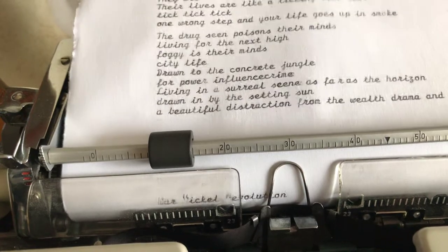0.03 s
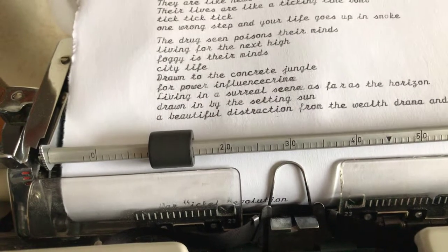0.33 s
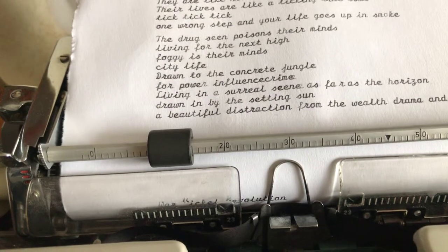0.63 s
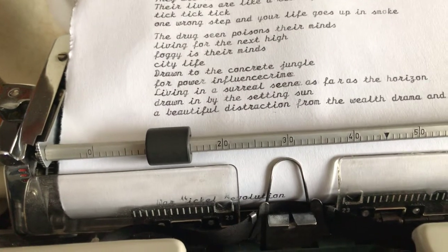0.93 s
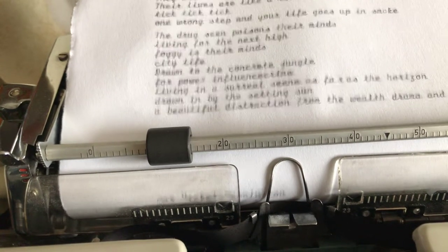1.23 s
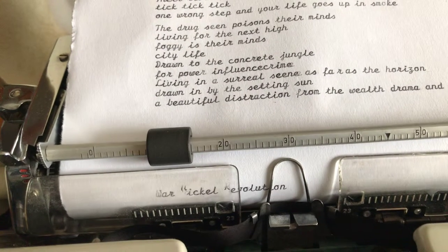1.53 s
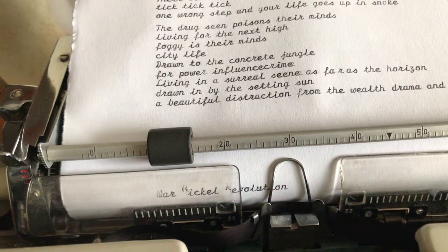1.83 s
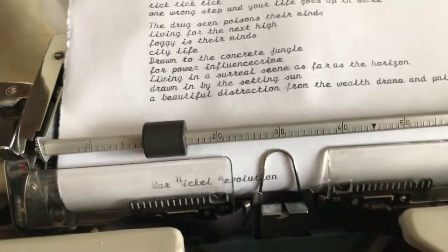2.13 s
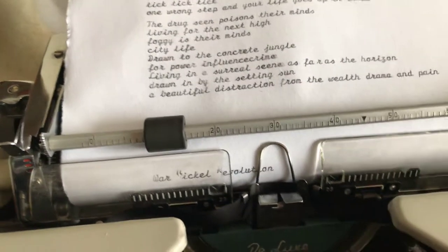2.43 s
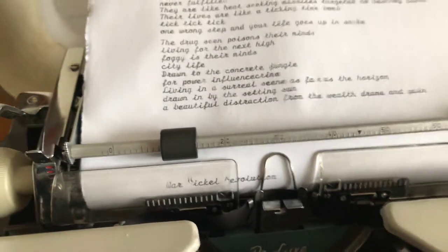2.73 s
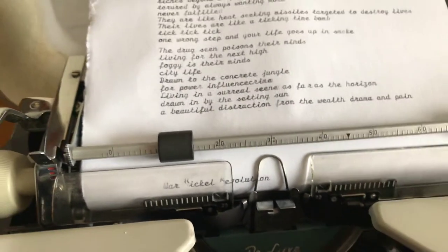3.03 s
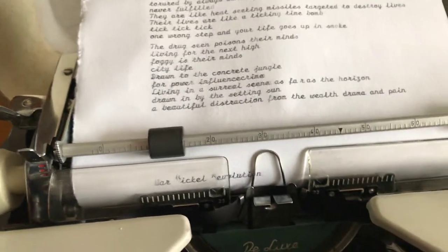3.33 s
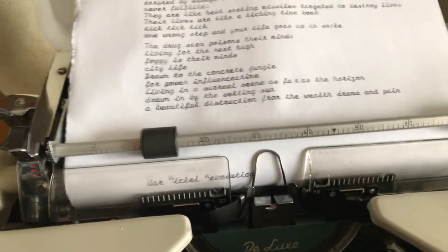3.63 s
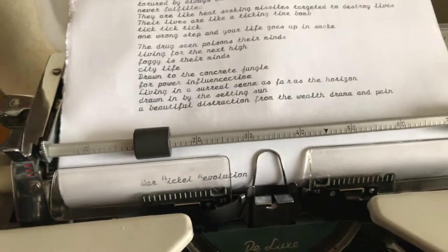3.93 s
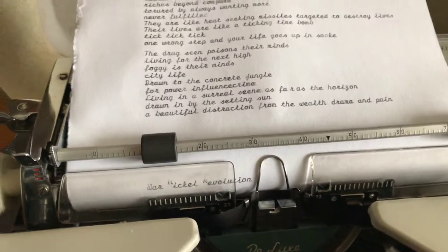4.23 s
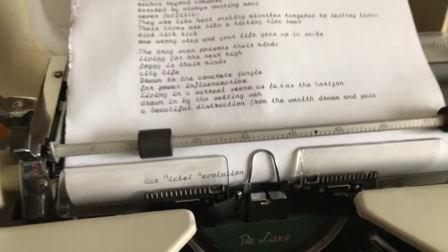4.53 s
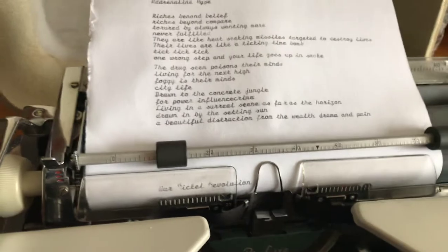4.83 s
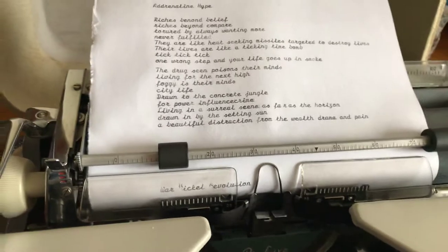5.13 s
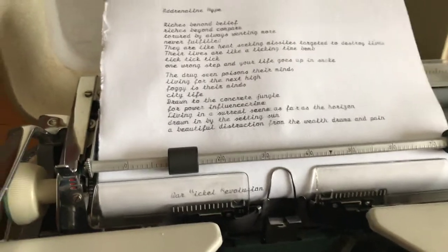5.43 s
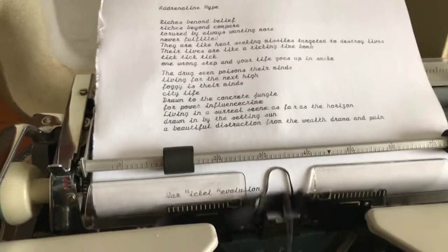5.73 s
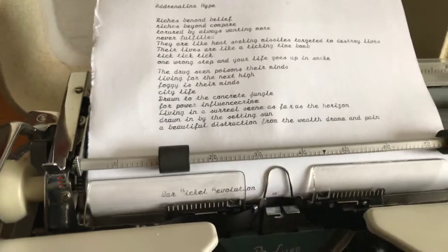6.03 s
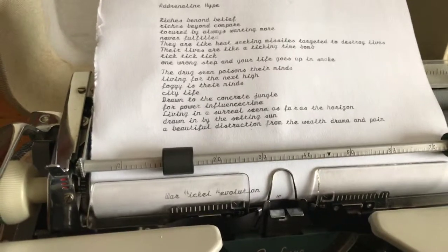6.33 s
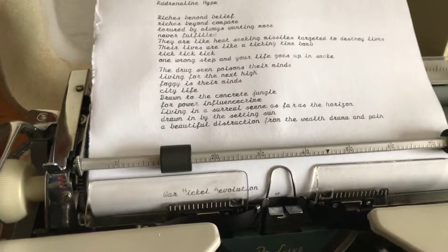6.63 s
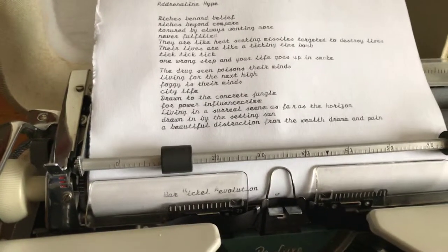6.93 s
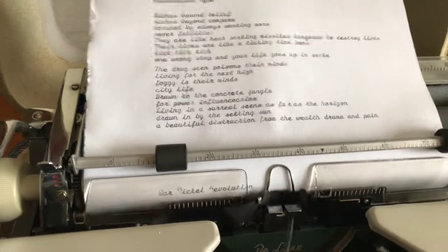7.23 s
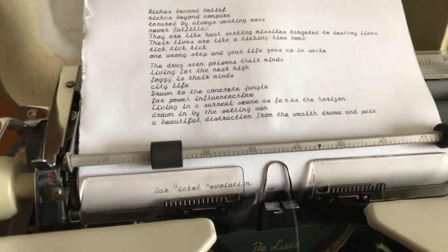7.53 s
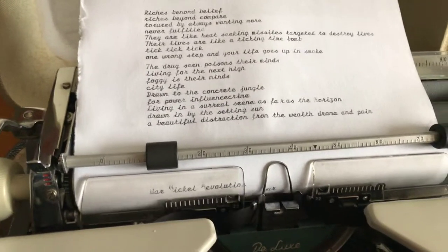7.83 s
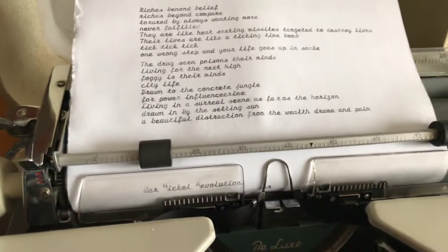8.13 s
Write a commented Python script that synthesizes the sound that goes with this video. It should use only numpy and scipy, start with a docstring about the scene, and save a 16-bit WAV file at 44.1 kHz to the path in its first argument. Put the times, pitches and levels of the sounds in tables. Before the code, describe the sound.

A manual typewriter is worked slowly on a desk in a quiet room, close to the microphone. The platen is turned with a few dry ratchet clicks. After a pause the space bar is tapped four times and the carriage steps back. Three separate letters then crack against the platen, each with a brief steel ring and a clink as the type bar falls back. One more space follows.

```python
"""A few dry ratchet clicks as a platen is turned: a portable manual typewriter on a desk in a quiet room,
one small microphone close by. The space bar is tapped four times, the carriage is stepped back,
three letters are struck and one more space follows. Levers scrape, type slugs crack on the platen
and the blows ring the steel frame; each jolt thuds into the desk and rattles the casing."""
import sys
import numpy as np
from scipy import signal
from scipy.fft import rfft, irfft
from scipy.io import wavfile

SR = 44100
rng = np.random.default_rng(int(sys.argv[2]) if len(sys.argv) > 2 else 0)


def bounce(signal):
    """Save signal as a 16-bit WAV file at the path given by the first command-line argument."""
    frames = np.transpose(np.atleast_2d(signal))
    limited = np.clip(frames, -1, 1)
    pcm = np.round(limited * 32767).astype(np.int16)
    wavfile.write(sys.argv[1], SR, pcm)


N = 360738

# Platen ratchet clicks. Each row: start in seconds, level in dB, decay in seconds, treble in dB.
RATCHET_CLICKS = [(.2884, -20, 0.0031, 8), (.694, -42, 0.005, -24), (1.2600, -19.5, 0.0041, -14),
                  (1.2808, -25, 0.0047, -9), (1.341, -44, 0.0035, -12)]
# Typed letters. Each row: key press, strike and landing times in seconds; strike, landing and key
# levels in dB; key scrape length in seconds; key treble in dB.
KEYSTROKES = [(5.694, 5.7657, 5.962, -13, -28, -46, .026, -8),
              (7.102, 7.1437, 7.281, -13, -28.5, -36, .0038, 13),
              (7.526, 7.5675, 7.694, -12.5, -29, -39.5, .011, 6)]
# The carriage halts. Each row: delay in seconds, thud in dB re step, rattle in dB re thud.
HALT_JOLT = [(.026, -10, -16)]
# Tone of the dull casing and of loose steel parts. Each row: frequency in Hz, gain in dB.
CASING_TONE = [(80, -6.5), (190, 6), (350, -3), (550, 1.5), (700, -3), (920, -1.5), (1100, -5), (1350, -3),
               (2400, -8), (4000, -17), (9000, -41), (16000, -40.5)]
CLATTER_TONE = [(100, -17), (380, -20), (600, -2.5), (900, -6.5), (1200, -1.5), (1600, -1), (2500, 12),
                (4000, 0), (6500, -2.5), (9000, -12.5), (16000, -16)]


def from_db(db):
    return 10 ** (np.asarray(db) / 20)


def at_hz(points, hz):
    """Read a table on a log-frequency axis."""
    known_hz, values = np.transpose(points)
    return np.interp(np.log(hz + 1), np.log(known_hz), values)


def add(track, s, sound):
    """Mix a sound into a track from s seconds on."""
    start = max(round(s * SR), 0)
    track[start:start + len(sound)] += sound[:N - start]


def colour(x, spectrum, size=8192):
    """Minimum-phase filter that keeps the power of white noise."""
    gain = from_db(at_hz(spectrum, np.arange(size // 2 + 1) * SR / size))
    cepstrum = irfft(np.log(gain))
    cepstrum[1:size // 2] *= 2
    cepstrum[size // 2 + 1:] = 0
    response = irfft(np.exp(rfft(cepstrum)))
    return signal.oaconvolve(x, response / np.linalg.norm(response))[:N]


def ring(clicks, hz, t60):
    """A unit click starts a sine of height 1 that falls 60 dB in t60 seconds."""
    radius = np.exp(-np.log(1000) / (t60 * SR))
    angle = 2 * np.pi * hz / SR
    return signal.lfilter([0, np.sin(angle)], [1, -2 * radius * np.cos(angle), radius ** 2], clicks + 1e-18)


def ring_modes(x, modes, gain_db):
    """A body rings in all its modes, neighbours in opposite senses."""
    return sum(ring(x, hz, t60) * from_db(mode_db + gain_db) * (-1) ** k
               for k, (hz, mode_db, t60) in enumerate(modes))


def resonate(x, modes):
    """The short-lived modes of a small part lift their own pitches out of each contact."""
    out = x
    for hz, lift_db, t60 in modes:
        b, a = signal.iirpeak(hz, np.pi * hz * t60 / np.log(1000), fs=SR)
        out = out + (from_db(lift_db) - 1) * signal.lfilter(b, a, x)
    return out


def soft_push(length_s):
    """A smooth pulse of force with unit area."""
    push = np.sin(np.pi * np.minimum(np.arange(SR // 20) / (length_s * SR), 1)) ** 2
    return push / push.sum()


def chatter(decay_s, rise_s, grain_db=3, size=16384):
    """One metal contact: a swarm of tiny uneven impacts that swells and dies."""
    t = np.arange(size) / SR
    envelope = (1 - np.exp(-t / rise_s)) * np.exp(-np.minimum(t / decay_s, 20))
    impacts, sizes = rng.standard_normal((2, size))
    swarm = envelope * impacts * from_db(grain_db * sizes)
    return swarm * np.sqrt(decay_s * SR / 2) / np.linalg.norm(swarm)


def scrape(length_s, grain_db=4, size=4096):
    """A lever slides over its guide: the grit swells with its speed and stops with it."""
    progress = np.arange(size) / (length_s * SR)
    speed = progress * np.exp(-np.minimum(progress ** 2, 20))
    impacts, sizes = rng.standard_normal((2, size))
    grit = speed * impacts * from_db(grain_db * sizes)
    return grit * np.sqrt(length_s * SR / 2) / np.linalg.norm(grit)


def contacts(rows, spectrum, touch, treble_hz=7000, **shape):
    """All chatters or scrapes of one part; each has its own level, length and brightness."""
    track = np.zeros(N)
    b, a = signal.butter(1, treble_hz, "high", fs=SR)
    for s, level_db, length_s, treble_db in rows:
        swarm = touch(length_s, **shape)
        treble = (from_db(treble_db) - 1) * signal.lfilter(b, a, swarm)
        add(track, s, from_db(level_db) * (swarm + treble))
    return colour(track, spectrum)


def after(s, level_db, stages):
    """Contacts at set delays from an action, scaled by its strength."""
    return [(s + delay_s, level_db + relative_db, *rest) for delay_s, relative_db, *rest in stages]


def along(start_s, end_s, level_db, stages):
    """Contacts at set places along a movement: a slower movement spreads them out."""
    return [(start_s + share * (end_s - start_s), level_db + relative_db, *rest)
            for share, relative_db, *rest in stages]


def room_tone(level_db=-58.6):
    """The still air of the room: a faint, low hush."""
    # Each row: frequency in Hz, gain in dB.
    air_tone = [(25, -9), (60, -5.5), (100, -6), (130, 1), (175, -7), (240, -4), (400, -12), (700, -18.5),
                (1200, -18.5), (2200, -21.5), (3200, -25.5), (5000, -32), (7000, -33), (10500, -41),
                (14000, -40.5)]
    return from_db(level_db) * colour(rng.standard_normal(N), air_tone)


def room_reflections(x, wet_db=-12.6, build_s=.0027):
    """Diffuse reflections build up, then die at their own rate in each band."""
    # Reverberation. Each row: frequency in Hz, t60 in seconds.
    decay_times = [(100, 0.39), (500, 0.85), (2500, 0.54), (6000, .48), (14000, 0.62)]
    # Its tone. Each row: frequency in Hz, gain in dB.
    reverb_tone = [(100, 5), (800, -2.5), (2400, 2.2), (4000, -2.5), (7000, -7), (14000, -6.5)]
    t, response = np.arange(SR) / SR, 0
    edges_hz = np.geomspace(40, 17000, 13)
    for low, high in zip(edges_hz, edges_hz[1:]):
        band_pass = signal.butter(2, [low, high], "band", fs=SR, output="sos")
        band = signal.sosfilt(band_pass, rng.standard_normal(SR))
        t60 = at_hz(decay_times, np.sqrt(low * high))
        response += band * np.exp(-np.log(1000) * t / t60)
    response *= 1 - np.exp(-t / build_s)
    wet = signal.oaconvolve(x, response / np.linalg.norm(response))[:N]
    return from_db(wet_db) * colour(wet, reverb_tone)


def lingering_ring(level_db=-45):
    """At the start the type basket is still ringing faintly from an earlier blow."""
    track = np.zeros(N)
    add(track, 0, from_db(level_db) * chatter(decay_s=.065, rise_s=.00084))
    return colour(track, CLATTER_TONE)


def desk_thuds(jolts, push_s=.0029, spread_db=1.5, rock_s=.043, rock_db=-9):
    """Soft pushes ring the desk, and the machine rocks back a moment later."""
    # Each row: frequency in Hz, level in dB, t60 in seconds.
    desk_modes = [(58.4, -5.5, .16), (84, -1.5, 0.082), (111.7, 1, 0.18), (134, -6, 0.08), (157, 1, 0.066),
                  (189, 2.5, 0.084), (228.5, -9, 0.16), (290, -4, 0.037)]
    out = np.zeros(N)
    strengths = from_db(spread_db * rng.standard_normal((len(jolts), len(desk_modes))))
    for (hz, mode_db, t60), strength in zip(desk_modes, strengths.T):
        pushes = np.zeros(N)
        for (s, thud_db, _), share in zip(jolts, strength):
            force = from_db(thud_db + mode_db) * share * soft_push(push_s)
            add(pushes, s, force)
            add(pushes, s + rock_s * rng.uniform(.9, 1.1), from_db(rock_db) * force)
        out = ring(pushes, hz, t60) - out   # neighbouring modes swing in opposite senses
    return out


def casing_rattle(jolts, direct_db=-1):
    """Each jolt rattles the thin, loose panels, which add a hollow ring."""
    # Each row: frequency in Hz, level in dB, t60 in seconds.
    panel_modes = [(544, -13, .4), (640, -2, .04), (738, -16, .2), (915, -11, .3), (945, -5, .04),
                   (1130, -13, .35), (1357, -11, .25), (1825, -10, .07), (2600, -4, .012)]
    rattle = np.zeros(N)
    for s, thud_db, rattle_db in jolts:
        add(rattle, s, from_db(thud_db + rattle_db) * chatter(decay_s=.034, rise_s=.005))
    hollow = ring_modes(rattle, panel_modes, gain_db=-30.5)
    return from_db(direct_db) * colour(rattle, CASING_TONE) + hollow


def carriage_lurches(push_s=.012):
    """The stopping carriage shoves the whole machine on its rubber feet."""
    # Each row: start in seconds, level in dB.
    lurches = [(4.752, -26), (5.772, -29), (5.95, -38), (7.70, -41)]
    pushes = np.zeros(N)
    for s, level_db in lurches:
        add(pushes, s, from_db(level_db) * soft_push(push_s))
    return ring(pushes, hz=52, t60=.13)


def frame_ring(blows):
    """Every blow rings the same modes of the steel frame and type basket."""
    # Each row: frequency in Hz, level in dB, t60 in seconds.
    steel_modes = [(956, -3, .12), (911, -6, .15), (1561, 0, .2), (1978, 4, 0.2), (2060, 1, .18),
                   (2283, 3, .22), (2410, 2, .22), (2476, 4, .22), (2650, 0, .2), (2780, -4, 0.22),
                   (2853, -2, .2), (3144, -2, .16), (3230, -3, .18), (3741, -6, .16), (4118, -2, .16),
                   (4264, -1, .18), (4405, -3, .18), (4638, -7, .16), (5225, -7, .14), (5435, -7, .15),
                   (6089, -6, .14), (6334, -6, .14)]
    return ring_modes(blows, steel_modes, gain_db=-68)


def key_springs():
    """The key springs give thin, very high pings."""
    # Each row: start in seconds, level in dB, decay in seconds, treble in dB.
    pings = [(3.192, -46, .004, 0), (3.447, -47, .004, 0), (3.621, -46, .004, 0), (3.785, -44, .004, 0),
             (4.731, -55, .004, 0), (5.988, -45, .004, 0), (6.059, -56, .004, 0), (7.705, -32, .003, 0),
             (7.721, -46, .002, 0), (7.799, -54, .003, 0), (7.955, -45, .004, 0)]
    # Each row: frequency in Hz, gain in dB.
    spring_tone = [(4000, -45), (13000, -30), (14200, -12), (14650, 0), (15100, -12), (16000, -26)]
    return contacts(pings, spring_tone, chatter, rise_s=.001)


def loose_parts(shakes):
    """The platen knocks dully in its bearings; type bars tick together and the shaken carriage clatters."""
    # Each row: start in seconds, level in dB, decay in seconds, treble in dB.
    bearing_knocks = [(.696, -46, .007, 0), (1.342, -42, .005, 0)]
    bar_ticks = [(1.549, -48, .002, -30)]
    knocks = contacts(bearing_knocks, CASING_TONE, chatter, rise_s=.0006)
    return knocks + contacts(bar_ticks + shakes, CLATTER_TONE, chatter, rise_s=.0006)


def lever_scrapes(scrapes):
    """Links slide in their guides, and keys tick under resting fingers."""
    # Each row: start in seconds, level in dB, length in seconds, treble in dB.
    finger_ticks = [(3.160, -56, .022, -5), (5.122, -61.5, .004, 8), (5.186, -71, 0.011, 21),
                    (5.278, -62.5, 0.0082, 7), (5.652, -59.5, 0.024, 3), (5.744, -47, .006, -2),
                    (7.915, -60, .025, -2)]
    # Each row: frequency in Hz, gain in dB.
    linkage_tone = [(200, 0.5), (1000, -1.5), (2600, -2), (4500, -4), (6300, -0.5), (8500, -8),
                    (10500, -10), (12500, -4), (16000, -10)]
    return contacts(scrapes + finger_ticks, linkage_tone, scrape)


def platen_action():
    """The pawl rides up each tooth; its drop shakes the carriage and jolts the machine."""
    # Each row: delay in seconds, level in dB re click, length or decay in seconds, treble in dB.
    pawl_climb = [(-.021, -24, .016, -19)]
    carriage_shake = [(.003, -24, .055, -2)]
    # Each row: delay in seconds, thud in dB re click, rattle in dB re thud.
    click_jolt = [(.008, -25, -17)]
    scrapes, shakes, jolts = [], [], []
    for s, level_db, *_ in RATCHET_CLICKS:
        scrapes += after(s, level_db, pawl_climb)
        shakes += after(s, level_db, carriage_shake)
        jolts += after(s, level_db, click_jolt)
    return scrapes, shakes, jolts


def ratchet(click_db=-2, spring_db=-62.5):
    """The pawl drops onto the steel wheel, which clacks; its spring goes on ringing."""
    # Each row: frequency in Hz, gain in dB, t60 in seconds.
    wheel_modes = [(2020, 7, .014), (3900, 7, .014), (4130, 8, .02), (5240, 12, .02), (6140, 7, .025),
                   (6900, 5, .012)]
    spring_modes = [(2600, -10, .3), (4340, 0, .68), (7350, -7, .3)]
    # Each row: frequency in Hz, gain in dB.
    pawl_tone = [(100, -16), (500, -5), (1000, -5), (1800, -1), (2350, 1.5), (3100, -3), (4050, 0),
                 (4700, -5), (6500, -3), (9000, -17), (16000, -26)]
    clicks = contacts(RATCHET_CLICKS, pawl_tone, chatter, rise_s=.0008)
    clacks = from_db(click_db) * resonate(clicks, wheel_modes)
    return clacks + sum(from_db(spring_db + db) * ring(clacks, hz, t60) for hz, db, t60 in spring_modes)


def space_action():
    """The space bar takes up its links, frees the carriage for one step and springs back."""
    # Each row: press, step and release times in seconds, then their three levels in dB.
    taps = [(3.191, 3.2337, 3.300, -29.5, -25, -31), (3.445, 3.486, 3.546, -30.5, -25, -31.5),
            (3.619, 3.6532, 3.710, -30, -25, -34), (3.783, 3.8205, 3.896, -30.5, -24.5, -29.5),
            (7.953, 7.9916, 8.098, -33.5, -28, -32.5)]
    # Going down. Each row: share of the travel, level in dB re press, length in seconds, treble in dB.
    take_up = [(.03, -6.5, .007, -4), (.37, -4, .0065, -7), (.15, -15, .03, -6)]
    # The stopping carriage shivers; the released links shake.
    # Each row: delay in seconds, level in dB re press or release, length in seconds, treble in dB.
    shiver = [(.005, -14, .014, -5)]
    link_shake = [(0, -5.5, .0045, -11), (.012, -7.5, .004, -4), (.020, -15, .014, -1)]
    # Each row: share of the travel, thud in dB re press, rattle in dB re thud.
    bottom_stop = [(.48, -4.5, -5.5)]
    # Each row: delay in seconds, thud in dB re release, rattle in dB re thud.
    upper_stop = [(.010, 2, -9)]
    # Each row: delay in seconds, level in dB re step, length in seconds, treble in dB.
    escapement_trip = [(0, 0, .0033, 0)]
    scrapes, steps, jolts = [], [], []
    for down_s, step_s, up_s, press_db, step_db, release_db in taps:
        scrapes += along(down_s, step_s, press_db, take_up) + after(up_s, release_db, link_shake)
        scrapes += after(step_s, press_db, shiver)
        steps += after(step_s, step_db, escapement_trip)
        jolts += along(down_s, step_s, press_db, bottom_stop) + after(up_s, release_db, upper_stop)
        jolts += after(step_s, step_db, HALT_JOLT)
    return scrapes, steps, jolts


def backspace_action(touch_s=.0035, catch_treble_db=-2, skid_treble_db=-7, skid_s=.006, loss_db=1):
    """A pawl catches the carriage, which then skids back over the escapement by one letter."""
    # Catch and drop times in seconds, then their two levels in dB.
    stroke = (4.671, 4.752, -36, -27.5)
    # Each row: delay in seconds, level in dB re catch or drop, length in seconds, treble in dB.
    link_drag = [(.004, -12, .012, -2), (.018, -7, .003, -3), (.036, -18, .008, 0)]
    # Each row: delay in seconds, thud in dB re catch or drop, rattle in dB re thud.
    jolt = [(.008, -9, -15)]
    catch_s, drop_s, catch_db, drop_db = stroke
    steps = [(catch_s, catch_db, touch_s, catch_treble_db)]
    steps += [(drop_s + k * skid_s, drop_db - k * loss_db, touch_s, skid_treble_db) for k in range(3)]
    scrapes = after(catch_s, catch_db, link_drag) + after(drop_s, drop_db, link_drag)
    jolts = after(catch_s, catch_db, jolt) + after(drop_s, drop_db, jolt + HALT_JOLT)
    return scrapes, steps, jolts


def carriage_steps(back_steps, space_steps):
    """The carriage clicks back over its dog and forward through the escapement."""
    # Each row: frequency in Hz, gain in dB.
    dog_tone = [(200, -17), (1200, -3.5), (2500, -5), (4000, -5), (6200, 1), (8200, -7), (10500, -13),
                (12000, -13), (16000, -26)]
    escapement_tone = [(200, -17), (1200, -7), (2500, -8), (4200, -6), (5300, 3), (6500, 6), (7800, -4.5),
                       (9500, -4), (10700, -9), (12300, -5.5), (13800, -15), (16000, -20)]
    return contacts(back_steps, dog_tone, scrape) + contacts(space_steps, escapement_tone, scrape)


def letter_action():
    """A key throws its type bar up, tripping the escapement; the bar recoils and bounces on its rest."""
    # Each row: start in seconds, level in dB, length in seconds, treble in dB.
    link_slips = [(5.716, -46, .003, -4), (5.730, -47, .004, -2), (5.8515, -43, .003, 10),
                  (5.9125, -37, .002, 8), (5.928, -46, .007, 4), (5.973, -44, .009, 7),
                  (5.987, -38, .0035, 4), (7.119, -40, .002, -3), (7.1325, -31, .002, -6),
                  (7.214, -46, .008, 12), (7.248, -46, .007, 9), (7.292, -42, .006, 7),
                  (7.665, -40, .009, 5), (7.704, -44, .005, 5)]
    # Each row: share of the rise, level in dB re strike, length in seconds, treble in dB.
    rise = [(.35, -33.5, .01, -3), (.83, -12.5, .0042, 6), (.92, -11.5, .0035, -3)]
    # Each row: delay in seconds, level in dB re strike or landing, length in seconds, treble in dB.
    recoil = [(.007, -14, .0035, -5), (.012, -26, .012, 8), (.026, -21, .008, -8)]
    bounces = [(0, 3.5, .0019, 5), (.007, -5, .002, 0), (.012, -5, .003, 0), (.020, -13, .0025, 0),
               (.028, -16, .0025, 0)]
    # Each row: delay in seconds, thud in dB re strike or landing, rattle in dB re thud.
    strike_jolt = [(.013, -23.5, -21)]
    landing_jolt = [(.001, -7, -16)]
    scrapes, landings, jolts = list(link_slips), [], []
    for down_s, hit_s, rest_s, strike_db, landing_db, *key_scrape in KEYSTROKES:
        scrapes.append((down_s, *key_scrape))
        scrapes += along(down_s, hit_s, strike_db, rise) + after(hit_s, strike_db, recoil)
        landings += after(rest_s, landing_db, bounces)
        jolts += after(hit_s, strike_db, strike_jolt) + after(rest_s, landing_db, landing_jolt)
    return scrapes, landings, jolts


def bar_landings(landings):
    """Falling type bars clink on their rest."""
    # Each row: frequency in Hz, gain in dB.
    rest_tone = [(300, -16), (2500, -21), (3500, -13), (4200, -1), (5200, -12), (6050, 1), (6500, 6.5),
                 (7200, -15), (9500, -17), (11500, -25), (16000, -39)]
    return contacts(landings, rest_tone, chatter, rise_s=.00059)


def type_strikes(crack_db=18.2, bounce_db=13, buzz_db=-7, knock_db=-1.5, clatter_db=-12.5,
                 flight_s=.0018, restitution=.5, loss_db=2, bounces=3):
    """The slug cracks on the platen and bounces ever faster into a buzz; bar and basket clang."""
    # The loose bar knocks in its guide.
    # Each row: start in seconds, level in dB, decay in seconds, treble in dB.
    guide_knocks = [(5.7707, -18, .0008, -3), (5.7739, -17, .0008, 0), (5.7760, -16, .001, 8),
                    (5.7790, -21, .001, 4), (5.7962, -25, .003, 8), (7.1513, -19, .002, -2),
                    (7.1575, -23, .002, 4), (7.1745, -25, .0025, 7), (7.5724, -18, .0007, 2),
                    (7.5755, -20, .001, -2), (7.5811, -15.5, .0009, 5), (7.5878, -24, .0012, 5),
                    (7.5968, -25, .003, 5), (7.6095, -31, .002, -3), (7.6425, -31, .002, -5)]
    # Type bar and platen. Each row: frequency in Hz, lift in dB, t60 in seconds.
    bar_modes = [(870, 2.5, .009), (1570, 4, .012), (2790, 6.5, .009), (3200, 4, .014), (3850, 7, .01),
                 (4440, 3, .012), (6030, 4, .008), (7420, 5.5, .014)]
    # Each row: frequency in Hz, gain in dB.
    slug_tone = [(100, -34), (380, -21), (600, -8), (880, -5.5), (1150, -10), (1550, -1), (2800, -2.5),
                 (4500, 4.5), (6000, 6.5), (7200, 1), (9000, -19), (16000, -28)]
    rebound_tone = [(100, -38.5), (380, -27), (600, -3), (860, -1), (1150, -3), (1600, -1), (2300, -2),
                    (2900, 1.5), (4300, -3.5), (6500, -2), (9000, -16), (16000, -24)]
    crack, rebound, basket = np.zeros((3, N))
    for _, s, _, level_db, *_ in KEYSTROKES:
        add(crack, s, from_db([level_db + crack_db]))
        flights = flight_s * restitution ** np.arange(bounces) * rng.uniform(.9, 1.1, bounces)
        for k, lag in enumerate(np.cumsum(flights)):
            add(rebound, s + lag, -from_db([level_db + bounce_db - k * loss_db]))
        add(rebound, s + flight_s, from_db(level_db + buzz_db) * chatter(decay_s=.0022, rise_s=.0004))
        clatter = chatter(decay_s=.019, rise_s=.0026, grain_db=5.5)
        add(basket, s, from_db(level_db + clatter_db) * clatter)
    knocks = from_db(knock_db) * contacts(guide_knocks, rebound_tone, chatter, rise_s=.0002)
    hits = colour(crack, slug_tone) + colour(rebound, rebound_tone) + knocks
    return resonate(hits, bar_modes) + colour(basket, CLATTER_TONE)


def scene():
    """The mechanism reaches the close microphone directly and through frame, desk and room."""
    # Stray soft thuds and rattles as keys return and the machine rocks.
    # Each row: start in seconds, thud in dB, rattle in dB re thud.
    stray_jolts = [(0.0, -46, -5.5), (4.024, -68, 21), (5.945, -42, -20), (7.365, -60, 7),
                   (7.685, -40, -20), (8.06, -41, -25)]
    letter_scrapes, landings, letter_jolts = letter_action()
    space_scrapes, space_steps, space_jolts = space_action()
    back_scrapes, back_steps, back_jolts = backspace_action()
    pawl_scrapes, shakes, pawl_jolts = platen_action()
    platen = ratchet() + loose_parts(shakes)
    carriage = carriage_steps(back_steps, space_steps)
    bars = bar_landings(landings)
    levers = lever_scrapes(letter_scrapes + space_scrapes + back_scrapes + pawl_scrapes)
    springs = key_springs()
    blows = type_strikes() + carriage + levers
    jolts = letter_jolts + space_jolts + back_jolts + pawl_jolts + stray_jolts
    machine = blows + frame_ring(blows) + desk_thuds(jolts) + casing_rattle(jolts) + carriage_lurches()
    # ratchet clicks and bar clinks sound dry, with little room echo
    reflections = room_reflections(machine + from_db(-14) * platen + from_db(-9) * bars)
    return (room_tone() + lingering_ring() + reflections + springs + platen + bars + machine)[None]


def record(dry, low_cut_hz=38, high_cut_hz=16000):
    """The small microphone loses the deepest bass; peaks clip at full scale and the top is cut steeply."""
    low_cut = signal.butter(3, low_cut_hz, "high", fs=SR, output="sos")
    high_cut = signal.ellip(10, .1, 70, high_cut_hz, fs=SR, output="sos")
    clipped = np.clip(signal.sosfilt(low_cut, dry), -1, 1)
    return signal.sosfilt(high_cut, clipped)


dry = scene()
out = record(dry)
bounce(out)
```